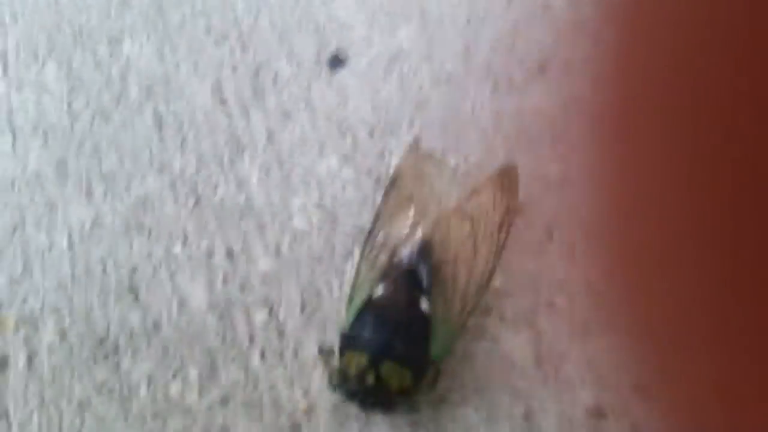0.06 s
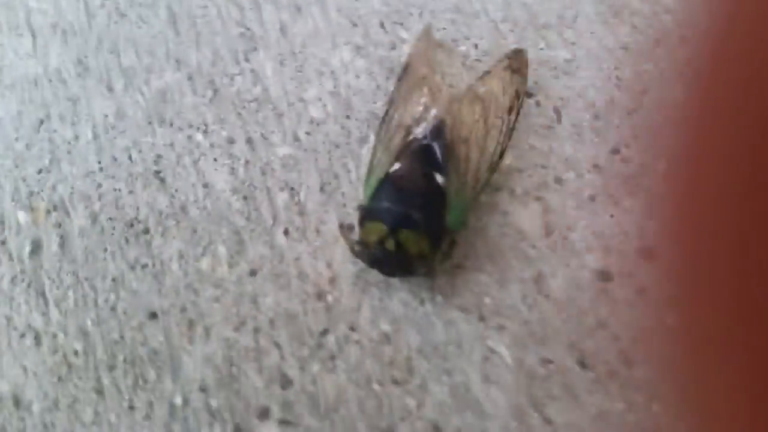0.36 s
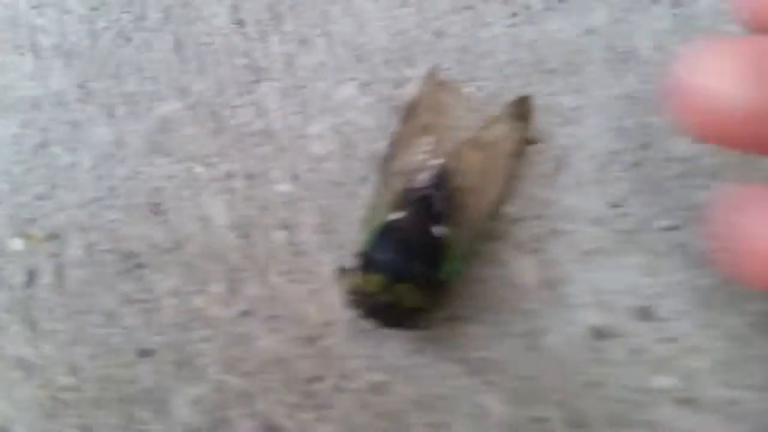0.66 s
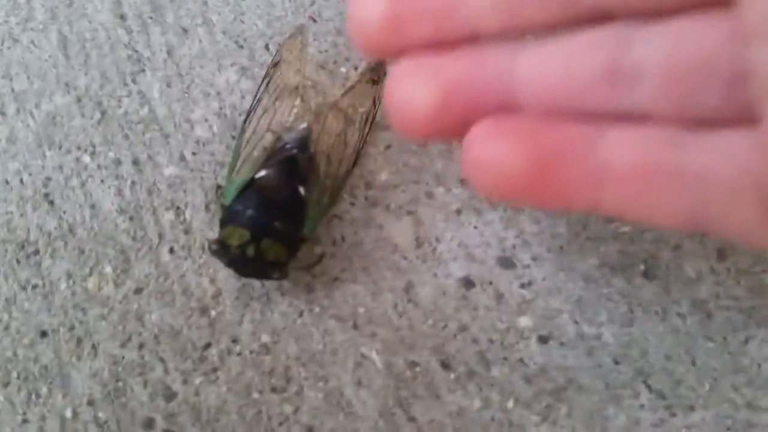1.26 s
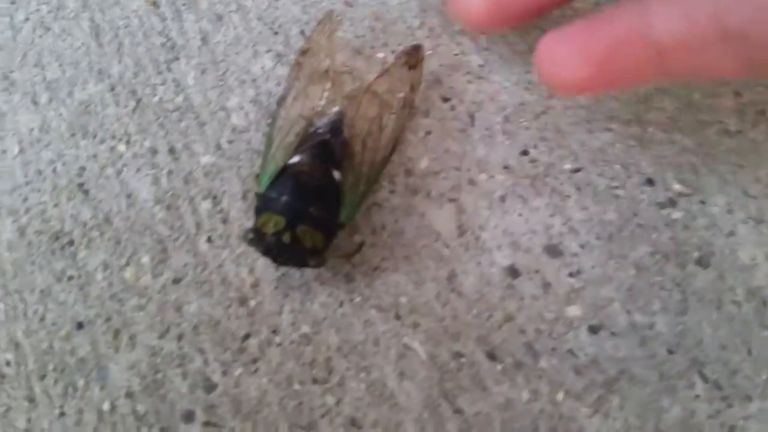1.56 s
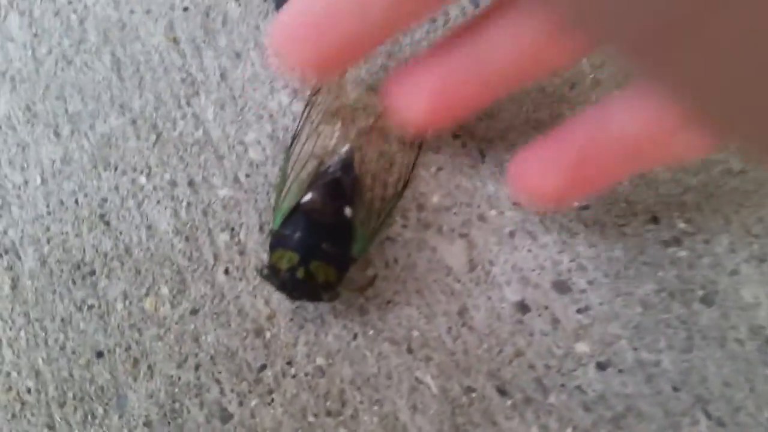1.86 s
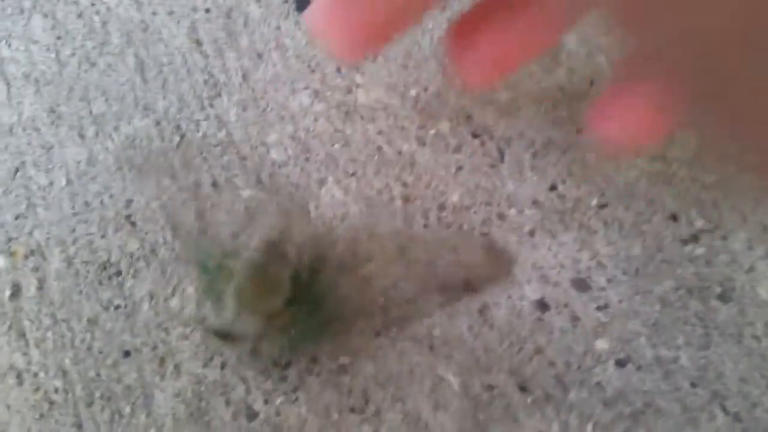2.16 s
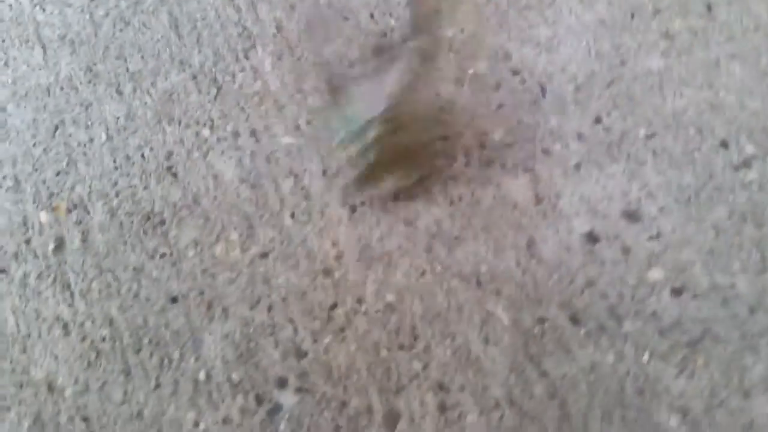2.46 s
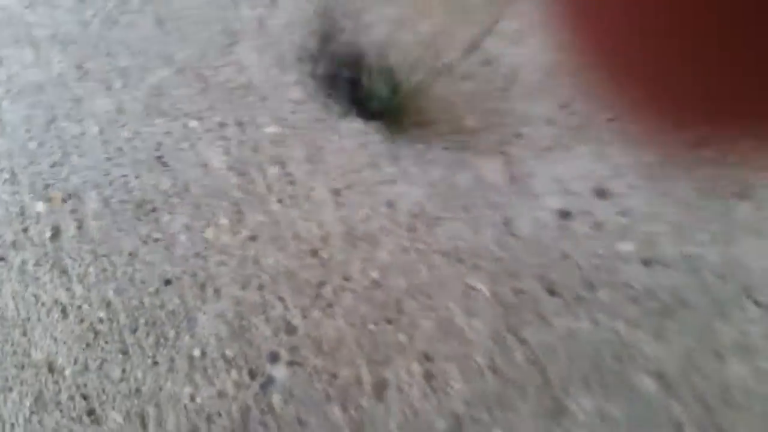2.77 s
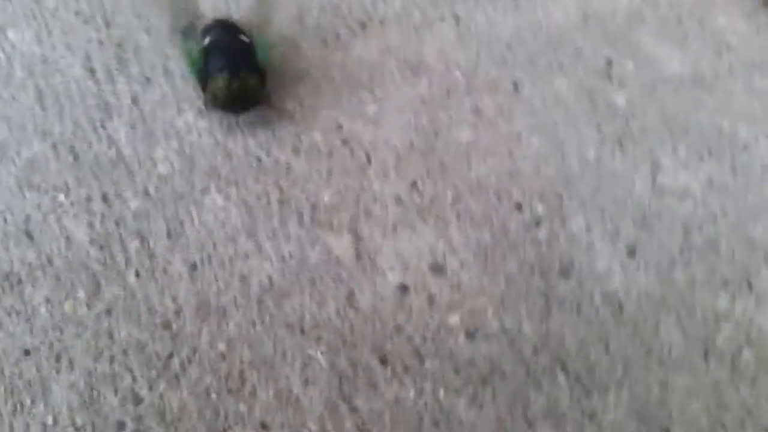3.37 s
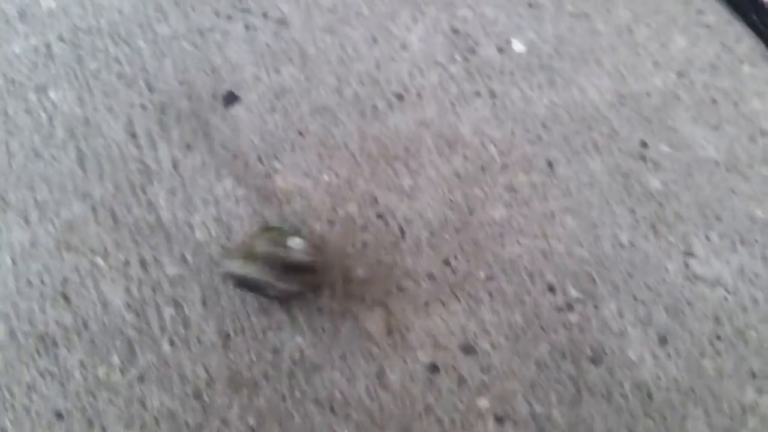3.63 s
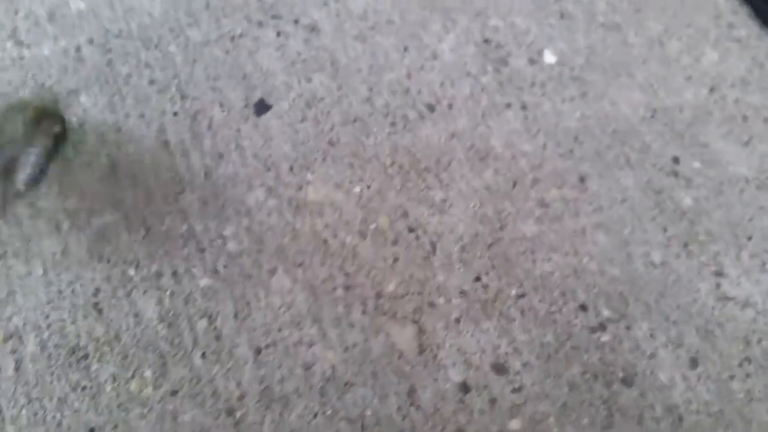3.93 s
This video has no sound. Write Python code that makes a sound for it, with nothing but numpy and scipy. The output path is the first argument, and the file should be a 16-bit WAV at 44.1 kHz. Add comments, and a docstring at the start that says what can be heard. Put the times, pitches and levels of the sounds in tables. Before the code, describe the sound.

A cicada thrashes on concrete, its stiff wings ticking and scraping close by. Before it starts, a hand rubs and knocks the microphone, and crickets chirp outdoors over a faint insect hiss and a low hum.

```python
"""A hand rustles and knocks on the recorder, amid a sizzling insect chorus and an air conditioner's hum.
Two bush crickets chirp by stridulation, rubbing wing on wing, and a far bird whistles.
A cicada is nudged on a concrete path and, from 2 s, thrashes about: impact and friction excite its
stiff wings, which tick and scrape on the grit. The two microphones hear quite different colours."""
import sys
import numpy as np
from scipy import signal
from scipy.fft import rfft, irfft
from scipy.io import wavfile

SR = 44100
rng = np.random.default_rng(int(sys.argv[2]) if len(sys.argv) > 2 else 0)


def wav_out(sig):
    """Save sig, one row per channel (or a flat mono array), as 16-bit PCM at SR to the path in sys.argv[1]."""
    wavfile.write(sys.argv[1], SR, np.round(np.clip(np.atleast_2d(sig).T, -1, 1) * 32767).astype(np.int16))


N = 176400
GRIT_PER_S, GRAIN_DECAY_S = 1100, 0.00046


def from_db(db):
    """Amplitude ratio: tenfold for every 20 dB."""
    return 10 ** (np.asarray(db) / 20)


def clock():
    """Uniform sampling: t/s of every sample."""
    return np.arange(N) / SR


def curve(rows):
    """Gain envelope, linear in level between (t/s, level/dB) points."""
    return from_db(np.interp(clock(), *np.transpose(rows)))


def drift(hz):
    """Low-passed Gaussian noise: smooth motion of spread 1, up to about the given rate."""
    slow = irfft(rfft(rng.standard_normal(N)) / (1 + (np.arange(N // 2 + 1) * SR / N / hz) ** 4), N)
    return slow / slow.std()


def colour(x, table):
    """Minimum-phase filter for each microphone from (f/Hz, left gain/dB, right gain/dB) points."""
    size = 2 * N
    hz, *sides = np.transpose(table)
    freqs = np.maximum(np.arange(N + 1) * SR / size, 1)
    gains = from_db([np.interp(np.log(freqs), np.log(hz), side) for side in sides])
    cepstrum = irfft(np.log(gains))
    cepstrum[:, 1:N] *= 2  # folding the cepstrum makes the filter causal
    cepstrum[:, N + 1:] = 0
    return irfft(rfft(x, size) * np.exp(rfft(cepstrum)))[:, :N]


def butterworth(order, hz, side="low"):
    """Sections of a maximally flat filter."""
    return signal.butter(order, hz, side, fs=SR, output="sos")


def noise(table, correlation=0):
    """Stereo noise of given spectrum level (level in a 1 Hz band)."""
    common = np.sqrt(correlation) * rng.standard_normal(N)
    separate = np.sqrt(1 - correlation) * rng.standard_normal((2, N))
    return colour((common + separate) * np.sqrt(SR / 2), table)


def narrow_noise(hz, width_hz):
    """Random quadrature modulation: a wavering tone of rms 1."""
    phase = 2 * np.pi * np.cumsum(hz * np.ones(N)) / SR
    return drift(width_hz) * np.sin(phase) + drift(width_hz) * np.cos(phase)


def swells(rows, width_share):
    """Gliding narrow-band noise under Gaussian envelopes."""
    tones = np.zeros(N)
    for s, sigma_s, hz, glide, db in rows:
        t = clock() - s
        envelope = from_db(db) * np.exp(-(t / sigma_s) ** 2 / 2)
        tones += envelope * narrow_noise(hz + glide * t, width_share * hz)
    return tones


def scatter(x, db, decay_s, direct=1):
    """Diffuse reflection: ground and walls add a decaying echo to the direct sound."""
    t = clock()[:SR // 2]
    tail = rng.standard_normal((2, len(t))) * np.exp(-t / decay_s)
    tail /= np.linalg.norm(tail, axis=1, keepdims=True)
    return direct * x + from_db(db) * signal.fftconvolve(x, tail, axes=1)[:, :N]


def air_conditioner(hum_hz=120.04):
    """Forced vibration: mains hum and its octave, over the broadband rumble of a fan and far traffic."""
    # hum envelope: t/s, level/dB
    hum_level = [(0, -40), (.6, -36), (2, -39), (2.6, -47), (4, -56.5)]
    # rumble spectrum: f/Hz, left level/dB, right level/dB
    rumble = [(22, -76, -81.5), (64, -58, -55.5), (99.5, -56.5, -61), (226, -69.5, -77.5), (460, -85, -90),
              (965, -89, -99.5), (5200, -115, -120)]
    # rumble envelope: t/s, level/dB
    rumble_level = [(0, 3), (2.3, -1), (4, -9.5)]
    phase = 2 * np.pi * hum_hz * clock()
    hum = np.sqrt(2) * (np.sin(phase) + from_db(-17.5) * np.sin(2 * phase)) * curve(hum_level)
    return hum * from_db([[1.5], [-1.5]]) + noise(rumble, correlation=0.88) * curve(rumble_level)


def chorus(flicker_db=1, fade_db_per_s=1.78):
    """Incoherent summation: countless far insects merge into fading bands of noise."""
    # chorus spectrum before the fade: f/Hz, left level/dB, right level/dB
    bands = [(1680, -100.5, -107), (2230, -83, -102), (3030, -87.5, -100), (3760, -73, -85.5),
             (3880, -88, -100), (4580, -77, -89), (5950, -74.5, -88.5), (6840, -85.5, -78),
             (7980, -77, -66), (9150, -107, -86), (9000, -107, -111)]
    # bright band at the right microphone: t/s, level/dB
    sizzle_level = [(0, -41.5), (.15, -32.5), (.36, -31.5), (.41, -41), (1, -82)]
    bed = noise(bands) * from_db(flicker_db * drift(30) - fade_db_per_s * (clock() + 0.5))
    sizzle = narrow_noise(hz=8420, width_hz=810) * curve(sizzle_level)
    return bed + sizzle * from_db([[-17], [0]])


def bird():
    """Frequency modulation: a far whistle glides up, a short one down."""
    # whistles: centre t/s, Gaussian width/s, f/Hz, glide/(Hz/s), left level/dB
    whistles = [(1.2, 0.13, 2470, 748, -54.5), (1.355, 0.024, 2230, -2500, -50.5)]
    return swells(whistles, width_share=0.034) * from_db([[0], [-11]])


def stridulate(chirps, hz, gap_s, strokes_db, trail_db):
    """Stridulation: each wing stroke is a slightly different pip that trails downward into a rasp."""
    pip_width_s, sag_hz_per_s, spread_hz, rasp_db = 0.0054, 42800, 21.8, -13
    t = clock()[:int(gap_s * SR)] - gap_s / 3
    sag_cycles = sag_hz_per_s * np.maximum(t - pip_width_s / 2, 0) ** 2 / 2
    pip, trail = np.exp(-(t / pip_width_s) ** 2 / 2), np.hanning(len(t))
    envelope = pip + from_db(trail_db) * trail
    rasp = from_db(rasp_db) * narrow_noise(hz - 260, width_hz=340)
    song = np.zeros(N)
    for s in chirps:
        for k, stroke_db in enumerate(strokes_db):
            start = int((s + (k - 1) * gap_s + t[0]) * SR)
            span = slice(start, start + len(t))
            tone = np.sin(2 * np.pi * (rng.normal(hz, spread_hz) * t - sag_cycles + rng.random()))
            song[span] += from_db(stroke_db) * (envelope * tone + trail * rasp[span])
    return song * from_db([[0], [-17.5]])


def crickets(echo_s=0.033):
    """Direct-to-reverberant ratio: the near cricket fades into its echo; the far one is mostly echo."""
    # near cricket: t/s of each chirp's second stroke
    near_chirps = [.142, .379, .657, .939, 1.283, 1.549, 1.827, 2.08, 2.35, 2.635, 2.945, 3.17, 3.44, 3.73]
    # far cricket: t/s of each chirp's second stroke
    far_chirps = [0.622, 1.171, 1.55, 1.921]
    # near cricket's direct sound: t/s, level/dB
    direct_level = [(.4, -26.5), (1.8, -29), (2.8, -46)]
    near = stridulate(near_chirps, hz=5026, gap_s=0.04, strokes_db=[-20, -6, -5, -4], trail_db=-12)
    near = scatter(near, db=-30, decay_s=echo_s, direct=curve(direct_level))
    far = stridulate(far_chirps, hz=5880, gap_s=0.033, strokes_db=[0] * 4, trail_db=-25)
    return near + from_db(-41.5) * scatter(far, db=4, decay_s=echo_s)


def finger_knocks(tick_decay_s=0.00073):
    """Impact excitation: a finger beside the right microphone rings the case's damped modes."""
    # case modes: f/Hz, level/dB, decay time/s
    modes = [(1096, 1, 0.00073), (2070, -15.5, 0.00078)]
    # knocks: t/s, relative level/dB, share of sharp tick
    blows = [(0.314, -15, 0.35), (0.3841, -2, 0.084), (0.418, -17.5, 0.43)]
    knocks, t = np.zeros(N), clock()[:SR // 20]
    ring = sum(from_db(db) * np.sin(2 * np.pi * hz * t) * np.exp(-t / decay) for hz, db, decay in modes)
    for s, db, sharp in blows:
        tick = sharp * rng.standard_normal(len(t)) * np.exp(-t / tick_decay_s)
        start = int(s * SR)
        knocks[start:start + len(t)] += from_db(db) * (ring + tick)
    return signal.sosfilt(butterworth(1, 400, "high"), knocks) * from_db([[-21], [2.5]])


def hand_rub(flicker_db=2.35):
    """Friction: skin rubs unevenly on the case, and once catches and squeaks."""
    # squeak: centre t/s, Gaussian width/s, f/Hz, glide/(Hz/s), level/dB
    scuffs = [(.075, 0.029, 3400, 0, -39)]
    # rubbing spectrum: f/Hz, left level/dB, right level/dB
    rub = [(447, -72.5, -86.5), (1160, -83, -85.5), (1860, -73, -79.5), (2490, -80, -84.5),
           (3150, -75, -80), (8600, -82, -80.5), (14600, -87, -89.5)]
    # rubbing envelope: t/s, level/dB
    rub_level = [(.42, 0), (.7, -13.5), (1.1, -30)]
    squeak = swells(scuffs, width_share=0.1) * from_db([[0], [-7]])
    return (noise(rub) * curve(rub_level) + squeak) * from_db(flicker_db * drift(34))


def grit(spread_db=5.5):
    """Poisson process: the energy of tiny random contacts, mean 1."""
    contacts = rng.random(N) < GRIT_PER_S / SR
    energy = contacts * from_db(spread_db * np.clip(rng.standard_normal(N), -2, 2)) ** 2
    return energy / energy.mean()


def crackle(energy, decay_s):
    """Buckling: at each contact the wing membrane gives an exponentially decaying noise burst."""
    retained = np.exp(-2 / (decay_s * SR))
    power = signal.lfilter([1 - retained], [1, -retained], energy + 1e-18)
    return np.sqrt(power) * rng.choice([-1, 1], (2, N))


def flutter(thrashed_s, wingbeat_hz=50.4, fall_db_per_s=8.5, clump_db=4):
    """Amplitude modulation: the wingbeat pulses a soft rustle that comes in fits and dies away."""
    beat = np.abs(np.sin(np.pi * wingbeat_hz * clock() + drift(6.2)))
    level_db = -30.5 - fall_db_per_s * thrashed_s + clump_db * drift(76)
    effort = (thrashed_s > 0) * beat * from_db(level_db)
    return signal.sosfilt(butterworth(1, 10700), crackle(effort ** 2 * grit(), GRAIN_DECAY_S))


def scrapes(fall_db=0.5, release_s=0.003):
    """Sliding friction: a wing drags over grit or under a finger in a train of tiny contacts."""
    # drags: onset t/s, duration/s, relative level/dB
    drags = [(0.879, 0.033, -39), (2.005, 0.027, -28), (2.158, 0.023, -18.5), (2.39, 0.027, -23.5),
             (2.491, 0.0061, -13), (2.551, 0.0091, -14.5), (2.736, .014, -16), (2.907, 0.022, -15.5),
             (3.014, .022, -23), (3.059, 0.007, -20), (3.406, 0.022, -19.5), (3.498, 0.011, -16.5),
             (3.557, .01, -19.5), (3.609, 0.0055, -23), (3.672, 0.023, -22.5), (3.799, 0.013, -28.5),
             (3.913, 0.011, -23.5), (3.938, 0.017, -27.5)]
    t, drag = clock(), np.zeros(N)
    for s, length, db in drags:
        age = np.maximum(t - s, 0)
        release = np.exp(-np.maximum(age - length, 0) / release_s)
        drag += (t >= s) * from_db(db - fall_db * age / length) * release
    return crackle(drag ** 2 * grit() / 2, GRAIN_DECAY_S)


def strikes(decay_s=0.0007, split_hz=6600):
    """Impact noise: each blow is a short crack, thin from a wing tip, fuller when the body lands."""
    # blows on the concrete: t/s, tip level/dB, body level re tip/dB
    blows = [(2.025, -16.5, 7), (2.047, -5, -1), (2.076, -5, -4), (2.0954, -16.5, 11.5), (2.1505, -8, -15),
             (2.1604, -11.5, 6), (2.307, -1, -4.5), (2.384, -11.5, -11), (2.4456, -7.5, 3),
             (2.4568, -14, 6.5), (2.5479, -9, 4.5), (2.5632, -12, 1), (2.638, -8, -2), (2.7501, -8, -10),
             (2.7964, -4.5, -10), (2.857, -9.5, -4), (2.9152, -6, -1), (3.0154, -9.5, 1),
             (3.1444, -8.5, -3), (3.1834, -11, -14), (3.412, -11.5, 1.5), (3.55, -5.5, -6),
             (3.6123, -15.5, 11.5), (3.6691, -13.5, 6.5), (3.7783, -8.5, -5.5)]
    tips, bodies = np.zeros((2, N))
    for s, db, body_db in blows:
        tips[int(s * SR)], bodies[int(s * SR)] = from_db([db, db + body_db]) ** 2 * decay_s * SR / 2
    thin = signal.sosfilt(butterworth(4, split_hz, "high"), crackle(tips, decay_s))
    full = signal.sosfilt(butterworth(4, split_hz), crackle(bodies, decay_s))
    return thin + full


def tumble(wings, thrashed_s, bass_fall_db_per_s=5, treble_fall_db_per_s=2):
    """Directivity: the treble wavers as the cicada turns; both band edges fade as it skitters off."""
    bass = signal.sosfiltfilt(butterworth(2, 2550), wings)
    below_treble = signal.sosfiltfilt(butterworth(2, 10400), wings)
    bass_gain = from_db(7 - bass_fall_db_per_s * thrashed_s)
    treble_gain = from_db(2.5 * drift(2.6) - treble_fall_db_per_s * thrashed_s)
    return bass * bass_gain + (below_treble - bass) + (wings - below_treble) * treble_gain


def wing_flex(wings, lag_s=0.000503, share=0.36):
    """Comb filtering: the wings flex, so their resonances wander and each blow rings differently."""
    t = clock()
    delay = lag_s * 2 ** (0.5 * drift(9.87))
    delayed = np.array([np.interp(t - delay, t, side) for side in wings])
    return (wings + share * delayed) / np.hypot(1, share)


def cicada(thrash_start_s=1.98):
    """Source and filter: strikes, scrapes and flutter are all coloured by the wings' resonances."""
    # wing response at each microphone: f/Hz, left level/dB, right level/dB
    wing_response = [(1330, -17.5, -21.5), (2390, -5, -21), (3460, 5, -14.5), (4990, 5, -11.5),
                     (6030, -6, -9), (7600, -6.5, 2), (9350, -15.5, 0), (11100, 3, -3), (15600, -2, -2.5)]
    thrashed_s = np.maximum(clock() - thrash_start_s, 0)
    contacts = strikes() + scrapes() + flutter(thrashed_s)
    wings = wing_flex(tumble(contacts, thrashed_s))
    return scatter(colour(wings, wing_response), db=-9.5, decay_s=0.0062)


def scene():
    """Superposition of all sources at the two microphones."""
    return cicada() + chorus() + bird() + crickets() + air_conditioner() + finger_knocks() + hand_rub()


def record(dry, cutoff_hz=16000):
    """Clipping and band limiting: peaks are cut at full scale, then the top is removed."""
    lowpass = signal.ellip(10, 0.05, 60, cutoff_hz, fs=SR, output="sos")
    return signal.sosfiltfilt(lowpass, np.clip(dry, -1, 1))


dry = scene()
out = record(dry)
wav_out(out)
```